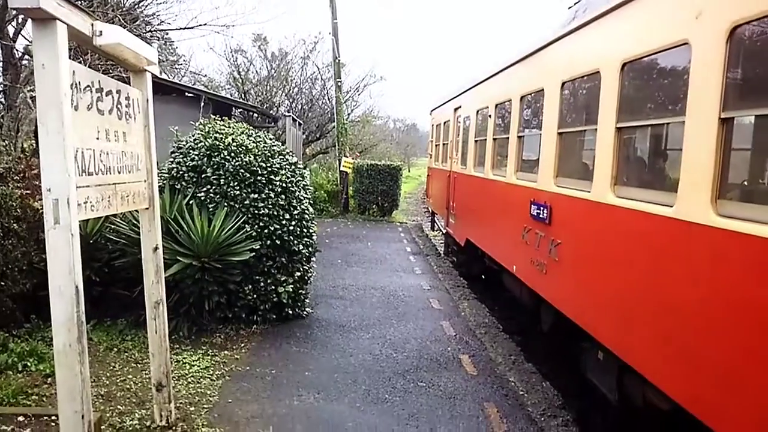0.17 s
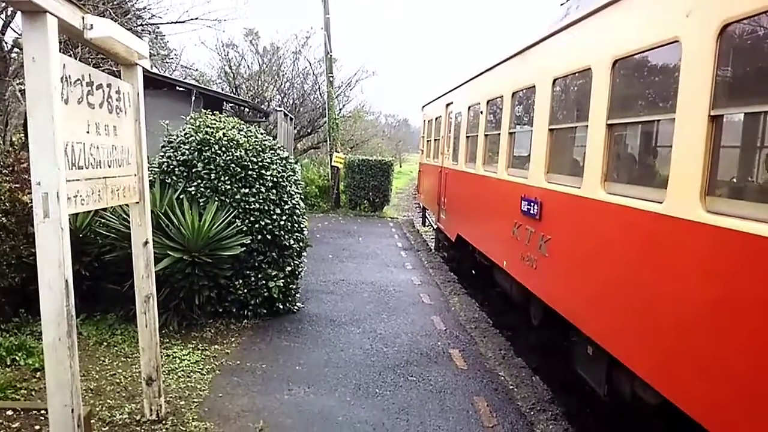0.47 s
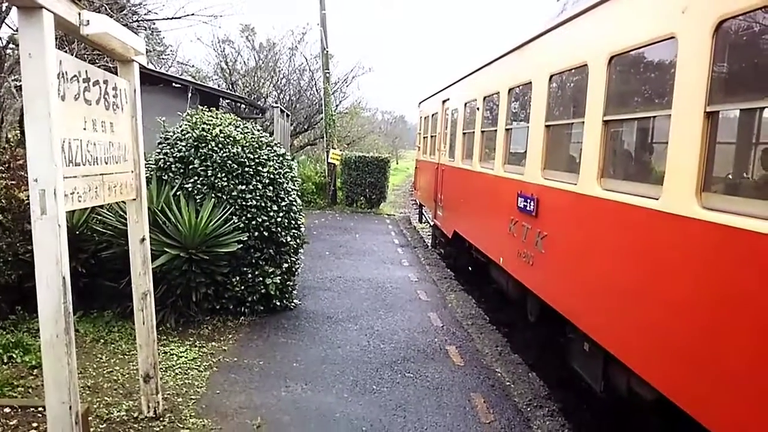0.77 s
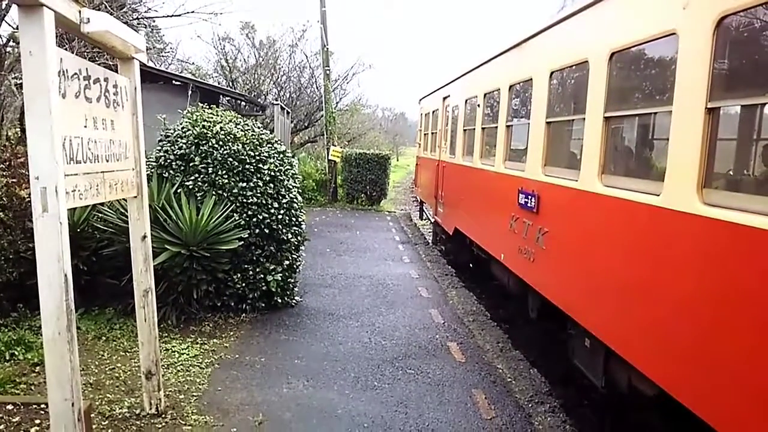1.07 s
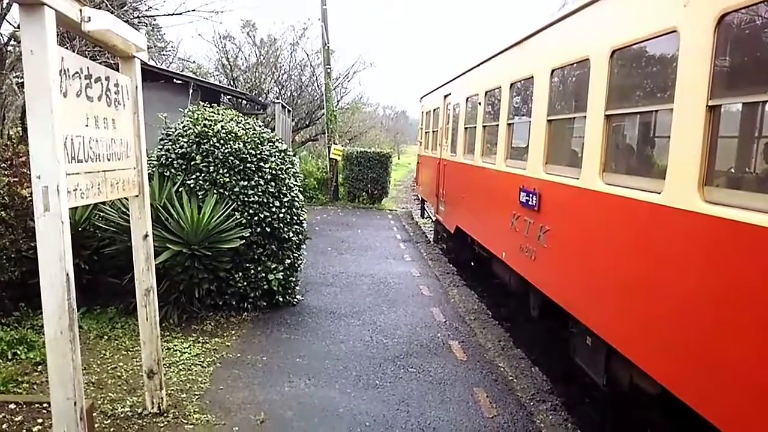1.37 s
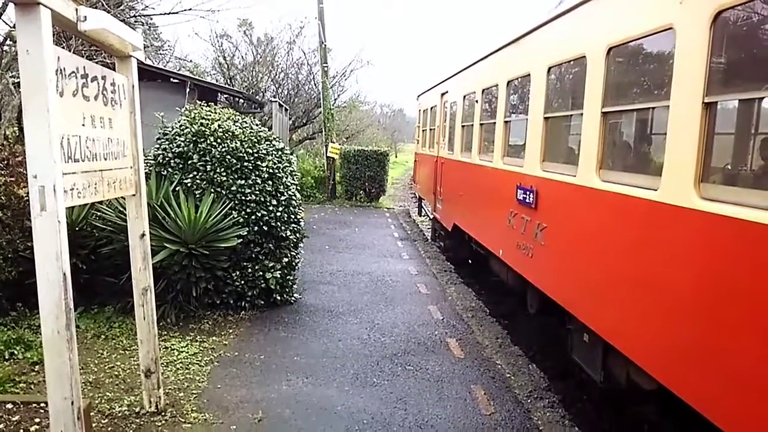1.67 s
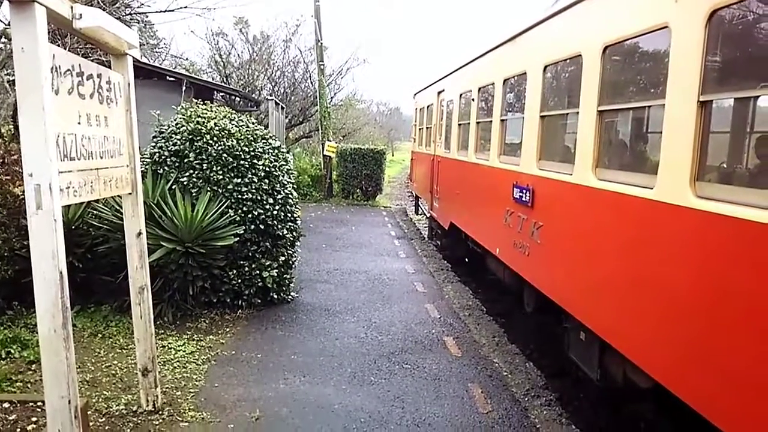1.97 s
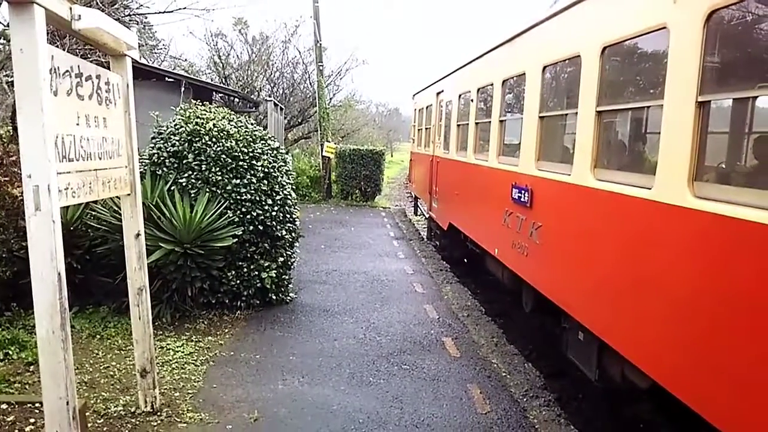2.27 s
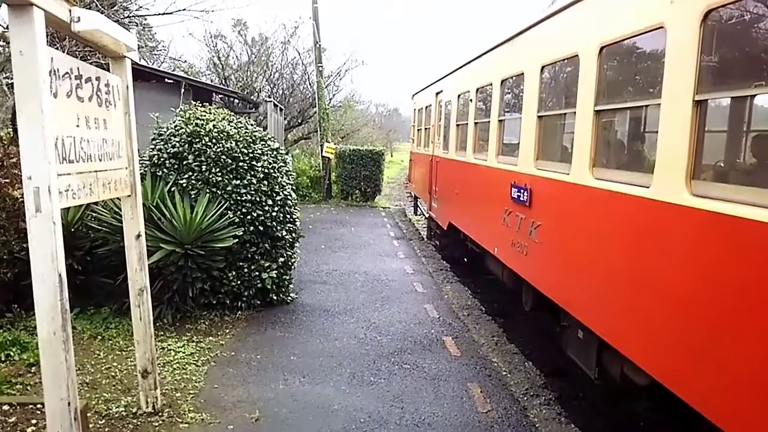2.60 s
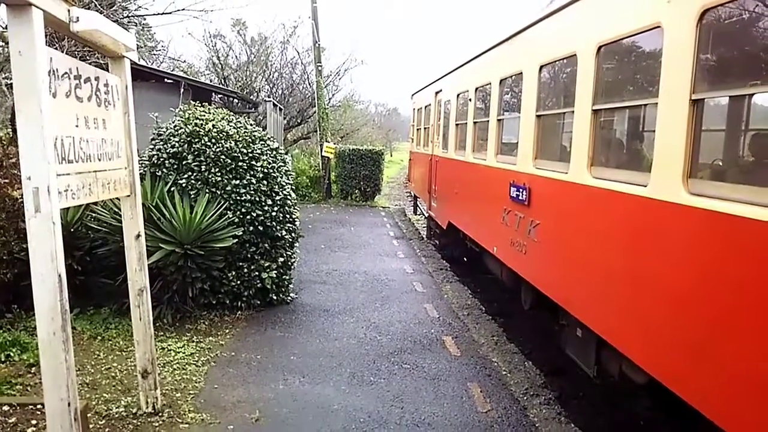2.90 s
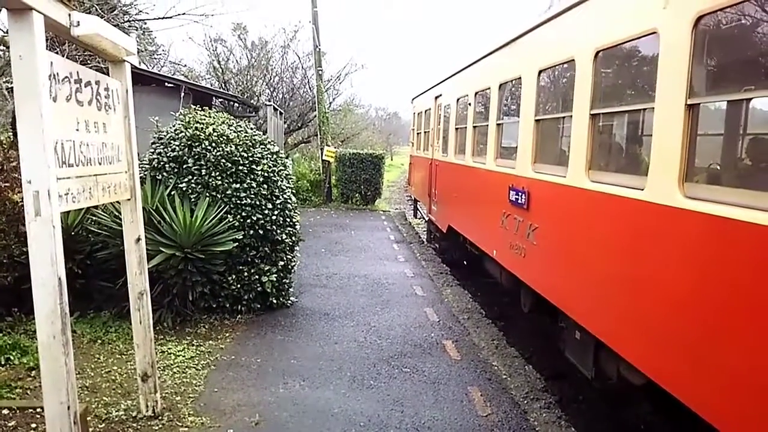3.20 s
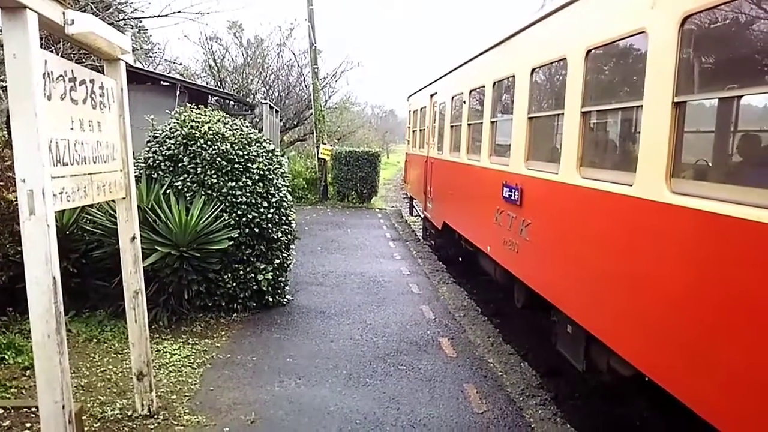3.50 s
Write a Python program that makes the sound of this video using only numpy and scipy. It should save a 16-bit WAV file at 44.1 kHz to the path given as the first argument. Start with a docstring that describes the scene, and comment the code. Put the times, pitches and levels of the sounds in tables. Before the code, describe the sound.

An old diesel railcar, a few metres away on an open platform. Until 1.5 s its engine hums fast and low, a loose steel cover rattling rapidly over steady hiss and faint air puffs. It drops to idle; a heavy crashing clank with an air rush hits at 1.87 s, a sharper ringing clank at 2.33 s. From 2.6 s the throb climbs, growling strongly after 3 s, with gritty chatter and a duller knock at 3.37 s.

```python
"""An old diesel railcar pulls away from a platform, a few metres from the listener.
The engine runs fast, sinks to idle and swells to a rising throb: harmonic tones and shaped noise follow
one firing phase. A loose steel cover rattles as noise under repeated knocks; heavy clanks, as drive and
coupling take up, are decaying modes with bursts of noise and echoes. Hiss, chance knocks and chatter of
the running gear are filtered noise, as are the faint puffs and longer rushes of air."""
import sys
import numpy as np
from scipy import signal
from scipy.fft import rfft, irfft
from scipy.io import wavfile

SR = 44100
rng = np.random.default_rng(int(sys.argv[2]) if len(sys.argv) > 2 else 0)


def master(y):
    """Save y as 16-bit WAV."""
    cut = np.clip(np.atleast_2d(y).T, -1, 1)
    pcm = np.round(cut * 32767)  # scale
    wavfile.write(sys.argv[1], SR, pcm.astype(np.int16))


N = 160965
T = np.arange(N) / SR  # time in seconds
KNOCK_RISE_S = 0.0042

# Course of the engine. Each row: time in seconds, firing rate in Hz,
# level of the exhaust note in dB before a fixed trim.
ENGINE_COURSE = [(0.03, 50.7, -50), (0.22, 53.9, -33.5), (0.53, 56.86, -30), (0.9, 57.44, -32),
                 (1.12, 56.8, -36), (1.35, 57.14, -29), (1.5, 54.4, -38), (1.58, 48.3, -39),
                 (1.68, 35.77, -37), (1.84, 35.06, -44), (2.23, 34.18, -54), (2.6, 35.07, -40),
                 (2.85, 41.07, -34), (3.04, 45.3, -24.5), (3.2, 50.25, -17.5), (3.5, 57.37, -17),
                 (3.56, 59.5, -32), (3.65, 62.1, -18)]
# Levels under the car, before fixed trims. Each row: time in seconds, rumble and exhaust overtones in dB,
# engine block in dB, clatter in dB.
UNDERCAR_LEVELS = [(0.03, -44, -45, -46), (0.15, -35.5, -36.5, -35.5), (0.26, -31, -33.5, -31.5),
                   (0.6, -35, -32, -30), (0.85, -29.5, -33.5, -31.5), (1.2, -31.5, -32.5, -29),
                   (1.44, -30, -33, -30), (1.54, -38.5, -34, -33), (1.7, -30, -34, -35),
                   (1.82, -34, -35, -36.5), (1.98, -27, -37, -37.5), (2.15, -33.5, -38.5, -34),
                   (2.3, -37, -36, -31), (2.45, -31.5, -36, -32), (2.58, -36.5, -40.5, -38.5),
                   (2.7, -33.5, -32.5, -32), (2.9, -30, -37, -34), (3.1, -31, -28.5, -31),
                   (3.2, -31, -35, -34), (3.28, -30.5, -27.5, -35), (3.45, -26.5, -37.5, -35),
                   (3.54, -25.5, -26.5, -33.5), (3.65, -26.5, -28, -31)]
# Unevenness of alternate firings. Each row: time in seconds, modulation depth from 0 to 1.
FIRING_UNEVENNESS = [(1.4, 0.2), (1.7, 0.1), (3.2, .55), (3.65, 0.39)]


def amp(db):
    """Logarithmic level: decibels become an amplitude ratio."""
    return 10 ** (np.asarray(db) / 20)


def unit(x):
    """Normalisation of power: scales a signal to rms 1."""
    return x / np.sqrt(np.mean(x ** 2) + 1e-20)


def curve(table, axis=1):
    """Linear interpolation: one column of a table becomes a course over time."""
    rows = np.array(table)
    return np.interp(T, rows[:, 0], rows[:, axis])


def colour(x, points):
    """Spectral filtering: weights x by a response interpolated over log frequency, at rms 1."""
    hz, db = np.transpose(points)
    f = np.fft.rfftfreq(N, 1 / SR)
    response = amp(np.interp(np.log(f + 1), np.log(hz + 1), db))
    return unit(irfft(rfft(x) * response, N))


def band(hz, width_hz):
    """Resonance: noise confined about one frequency, halved in amplitude width_hz away, at rms 1."""
    f = np.fft.rfftfreq(N, 1 / SR)
    resonance = 1 / (1 + ((f - hz) / width_hz) ** 2)
    return unit(irfft(rfft(rng.standard_normal(N)) * resonance, N))


def drift(hz):
    """Low-pass random fluctuation: a wander about zero, at rms 1."""
    return band(0, hz)


def grit(grain_db):
    """Friction noise: random amplitude modulation stands for tiny contacts of unequal strength."""
    return unit(rng.standard_normal(N) * amp(grain_db * drift(650)))


def strike(start, rise, t60):
    """Impulsive excitation: a linear rise, then exponential decay by 60 dB in t60 seconds."""
    age = T[:SR]
    decay = amp(-60 * np.maximum(age - rise, 0) / t60)
    return np.pad(np.minimum(age / rise, 1) * decay, (round(start * SR), N))[:N]


def ring(modes, start, rise):
    """Modal superposition: a struck part sounds as a sum of decaying sines."""
    age = T[:SR]
    hz, db, t60 = np.transpose(modes)[:, :, None]
    decay = amp(db - 60 * np.maximum(age - rise, 0) / t60)
    tones = decay * np.sin(2 * np.pi * (hz * age + rng.random(hz.shape)))
    return np.pad(np.minimum(age / rise, 1) * tones.sum(0), (round(start * SR), N))[:N]


def steely(x, share=0.43, t60=0.039):
    """High modal density: convolution with decaying noise adds the short ringing of a steel sheet."""
    tail = rng.standard_normal(N) * strike(0, 1 / SR, t60)
    return x + share * signal.fftconvolve(x, tail / np.linalg.norm(tail))[:N]


def knock_series(at, spread_db, t60):
    """Repeated impacts: a pulse of random strength at each given sample excites a decaying envelope."""
    strengths = amp(spread_db * np.clip(rng.standard_normal(N), -2, 2))
    hits = np.zeros(N)
    hits[at] = strengths[:len(at)]
    return unit(signal.fftconvolve(hits, strike(0, KNOCK_RISE_S, t60))[:N])


def chance_knocks(knocks_per_s, spread_db, t60):
    """Poisson-like excitation: knocks fall at random moments with a fixed mean rate."""
    moments = np.flatnonzero(rng.random(N) < knocks_per_s / SR)
    return knock_series(moments, spread_db, t60)


def throb(turns, depth):
    """Subharmonic modulation at half the firing rate: every second firing is the stronger one."""
    return unit(1 + depth * np.sin(np.pi * turns + np.pi / 4))


def yard(x, above_hz=300):
    """Diffuse reflection: sparse decaying echoes between car body and platform, without the bass."""
    echo_db, echoes_per_s = -12, 2000
    chosen = rng.random(N) < echoes_per_s / SR
    tail = rng.standard_normal(N) * chosen * strike(0.011, 0.0055, t60=0.15)
    tail = signal.sosfilt(signal.butter(4, above_hz, "high", fs=SR, output="sos"), tail)
    return x + amp(echo_db) * signal.fftconvolve(x, tail / np.linalg.norm(tail))[:N]


def puffs(count=5):
    """Turbulent jet noise: regular puffs of air, probably from the compressor, and longer rushes."""
    # Spectrum of the air. Each row: frequency in Hz, relative level in dB.
    air_spectrum = [(3000, -21), (6000, 6.5), (8500, 4.5), (10500, -3.5), (14000, -20)]
    # Longer rushes. Each row: start in seconds, level in dB.
    air_rushes = [(1.856, -22), (3.37, -31)]
    first_s, every_s, length_s, puff_db = 0.243, 0.29, 0.053, -39
    swell = np.zeros(N)
    for k in range(count):
        progress = np.clip((T - first_s - k * every_s) / length_s, 0, 1)
        swell += np.sin(np.pi * progress)
    rushes = sum(amp(db) * strike(start, rise=0.016, t60=0.36) for start, db in air_rushes)
    return (amp(puff_db) * swell + rushes) * colour(grit(3.6), air_spectrum)


def sizzle(turns, depth=0.057, knocks_per_s=45, knock_share=0.29, ring_flutter_db=2):
    """Amplitude modulation: firings and chance knocks shape the running gear's hiss and thin steel ring."""
    # Levels. Each row: time in seconds, hiss in dB, steel ring in dB.
    sizzle_levels = [(0.03, -49, -66), (0.25, -39.5, -47), (1.5, -38.5, -40.5), (1.8, -34.5, -67),
                     (2.05, -34, -61), (2.2, -37.5, -65), (2.6, -35.5, -50), (2.75, -33.5, -39),
                     (3.1, -32, -43.5), (3.3, -33, -38), (3.45, -28.5, -44), (3.65, -35.5, -51)]
    # Spectrum of the hiss. Each row: frequency in Hz, relative level in dB.
    hiss_spectrum = [(1530, -16), (2600, -18), (3170, -23), (3540, -1.5), (3670, -6), (4140, -4.5),
                     (4470, -5.5), (4970, -4), (6780, 0), (7860, -10), (11700, -19), (14000, -28)]
    ring_hz, ring_width_hz = 3680, 110
    knocks = chance_knocks(knocks_per_s, spread_db=2.0, t60=0.059)
    firing = 1 + depth * np.cos(2 * np.pi * turns)
    beat = unit(firing * (1 - knock_share + knock_share * knocks))
    hiss = colour(steely(grit(0.61)), hiss_spectrum)
    steel_ring = unit(band(ring_hz, ring_width_hz) * amp(ring_flutter_db * drift(33)))
    return beat * (amp(curve(sizzle_levels, axis=1)) * hiss + amp(curve(sizzle_levels, axis=2)) * steel_ring)


def chatter(knocks_per_s=260):
    """Dense random impacts: small contacts ring the running gear with a gritty sound."""
    # Each row: time in seconds, level in dB.
    chatter_level = [(2.55, -65), (2.72, -36.5), (2.85, -53), (2.95, -34), (3.02, -44), (3.1, -34),
                     (3.16, -40), (3.36, -42), (3.5, -49), (3.65, -47)]
    # Ringing of the gear. Each row: frequency in Hz, relative level in dB.
    chatter_spectrum = [(3000, -40), (3450, -12), (3700, 0), (4100, 5), (4500, -1), (5200, -19),
                        (7000, -30)]
    knocks = chance_knocks(knocks_per_s, spread_db=1.5, t60=0.046)
    return amp(curve(chatter_level)) * colour(knocks * rng.standard_normal(N), chatter_spectrum)


def rattle_beat():
    """Periodic impact: the cover knocks at its own rate while the engine runs fast."""
    # Each row: time in seconds, knocks per second.
    rattle_rate = [(0.38, 26.9), (0.44, 29.3), (0.65, 29.3), (0.71, 27), (0.99, 27), (1.05, 28.3),
                   (1.27, 28.3), (1.33, 30)]
    start_s = 0.035
    knock_count = np.cumsum(curve(rattle_rate) * (T > start_s)) / SR
    moments = np.flatnonzero(np.diff(np.ceil(knock_count)))
    return knock_series(moments, spread_db=3.5, t60=0.17)


def loose_steel(knocking, t60=0.17):
    """Impact and resonance: knocks gate the steel noise of the cover, and louder single ones also ring."""
    # Strength of the cover's rattle. Each row: time in seconds, level in dB.
    rattle_level = [(0.04, -39.5), (0.12, -40), (0.155, -32), (0.2, -43.5), (0.24, -31.5), (0.38, -34),
                    (0.48, -34.5), (0.54, -29), (0.63, -29.5), (0.69, -36.5), (0.78, -41), (0.85, -31),
                    (0.95, -36), (1.12, -33), (1.35, -33.5), (1.48, -31), (1.62, -42), (1.8, -51),
                    (2.2, -54), (3.65, -62)]
    # Spectrum of the cover. Each row: frequency in Hz, relative level in dB.
    cover_spectrum = [(1530, -37), (2600, -10.5), (2950, -5), (3330, 7), (3750, -9), (4110, 0.5),
                      (6450, 1.5), (7320, -14), (7970, -15.5), (8610, -21.5), (9770, -31), (12500, -31),
                      (14000, -26)]
    # Knocks of loose steel under the car. Each row: start in seconds, level in dB, ring frequency in Hz,
    # ring level in dB relative to the scrape.
    single_knocks = [(.223, -30, 3320, 0), (.334, -39, 6430, 5), (.408, -37, 3400, -2),
                     (0.44, -37, 3370, 7), (.510, -27.5, 3380, -5), (.612, -33, 5400, -3),
                     (0.719, -29.5, 3300, -3.5), (.975, -33, 6400, -3), (1.011, -25, 3378, -1.5),
                     (1.12, -32, 3960, -1), (1.193, -38, 3370, -8), (1.294, -27.5, 3300, -1.5),
                     (1.468, -33, 5620, -7), (1.527, -29, 3790, 5.5), (1.555, -34, 3650, 5),
                     (1.641, -40, 5700, 10.5), (1.822, -34, 2370, 2.5), (1.995, -30, 6720, -5),
                     (2.028, -34, 3446, -2), (2.248, -31.5, 3800, 4.5), (2.281, -43, 1343, 14),
                     (2.287, -32.5, 7180, 6.5), (2.432, -32.5, 3740, 3), (2.497, -30, 5730, 0.5),
                     (2.640, -40, 6960, 4), (2.724, -39.5, 3656, 12), (2.921, -38, 3730, 7.5),
                     (3.035, -41, 4100, 6.5), (3.092, -39, 3850, 7.5), (3.115, -45, 1490, 14.5),
                     (3.605, -32, 3795, -6)]
    ring_width_hz = 190
    scrape = colour(steely(grit(3.3)), cover_spectrum)
    out = amp(curve(rattle_level)) * knocking * colour(steely(grit(2.4)), cover_spectrum)
    for start, db, hz, ring_db in single_knocks:
        knock_sound = scrape + amp(ring_db) * band(hz, ring_width_hz)
        out += amp(db) * strike(start, KNOCK_RISE_S, t60) * knock_sound
    return out


def clanks():
    """Impulsive modal excitation: slack taken up crashes steel and sets body, drive and coupling ringing."""
    # Each row: start in seconds, crash in dB, rise in seconds, crash t60 in seconds, low thump in dB,
    # drive knock in dB, coupling ring in dB.
    blows = [(0.696, -42, 0.0079, .2, -24, -37, -23.5), (1.675, -53, 0.0098, .15, -23, -34, -42),
             (1.860, -21.5, 0.01, 0.36, -18, -15, -31), (1.869, -17, 0.0028, 0.07, -40, -30, -36),
             (1.887, -24.5, .003, 0.22, -25, -30, -42), (1.914, -29.5, 0.0036, 0.34, -14, -23, -34),
             (2.324, -21, 0.014, 0.29, -50, -50, -15), (2.331, -20.5, 0.0051, 0.18, -50, -50, -31),
             (2.357, -34, 0.0066, .16, -50, -50, -25.5), (2.419, -48, .006, 0.21, -26, -36, -37),
             (2.862, -52, .006, 0.16, -19, -40, -44), (3.368, -27, 0.011, 0.61, -27, -19.5, -46)]
    # Spectrum of the crash. Each row: frequency in Hz, relative level in dB.
    crash_spectrum = [(100, -18), (400, -5), (620, -4), (900, 2.5), (1230, -10), (1650, 0), (1900, -1.5),
                      (2400, 3), (3000, -2.5), (3700, 2.5), (4500, -2.5), (6600, 4), (8000, -8.5),
                      (10000, -24), (14000, -42)]
    # Dull boom of the underframe behind the coupling. Each row: frequency in Hz, relative level in dB.
    frame_spectrum = [(170, -24), (270, 10), (400, -2), (540, 4), (760, 3), (900, 2.5), (1150, -5),
                      (1600, -7.5), (3000, -38)]
    # Modes of the sprung body. Each row: frequency in Hz, relative level in dB, t60 in seconds.
    body_modes = [(81.2, 0.5, 0.12)]
    # Modes of the drive. Each row: frequency in Hz, relative level in dB, t60 in seconds.
    drive_modes = [(164.5, -0.5, 0.176), (374.4, -10.5, 0.14)]
    # Modes of the coupling. Each row: frequency in Hz, relative level in dB, t60 in seconds.
    coupling_modes = [(279.6, 1, 0.26), (305, 0, 0.16), (517.5, -7.5, .13), (560, -14, .2), (664, -9.5, .2),
                      (867, -4.5, 0.16), (898, -11.5, 0.11), (2000, -12.5, 0.17), (6860, -24, .35)]
    # Modes of the steel fittings. Each row: frequency in Hz, relative level in dB, t60 in seconds.
    steel_modes = [(1604, 8, 0.22), (2140, 5, 0.15), (2290, 7, 0.079), (2534, 10, 0.054), (4650, 2, 0.12),
                   (5146, -3, 0.26), (6660, 2, 0.34)]
    steel_db, frame_db, frame_t60_s = -15, -7, 0.36
    crash_noise = colour(steely(grit(2.2)), crash_spectrum)
    boom_noise = colour(grit(1.0), frame_spectrum)
    out = np.zeros(N)
    for start, db, rise, t60, thump_db, drive_db, coupling_db in blows:
        crash = strike(start, rise, t60) * crash_noise
        out += amp(db) * (crash + amp(steel_db) * ring(steel_modes, start, rise))
        out += amp(thump_db) * ring(body_modes, start, rise)
        out += amp(drive_db) * ring(drive_modes, start, rise)
        boom = strike(start, rise, frame_t60_s) * boom_noise
        out += amp(coupling_db) * (ring(coupling_modes, start, rise) + amp(frame_db) * boom)
    return out


def growl(turns, depth=0.4, lump=0.45):
    """Load-dependent radiation: under load each firing barks through the underframe."""
    # Each row: time in seconds, level in dB.
    load_level = [(2.6, -62.5), (2.95, -49), (3.1, -32), (3.2, -34), (3.28, -27.5), (3.44, -33),
                  (3.55, -30), (3.65, -28)]
    # Each row: frequency in Hz, relative level in dB.
    growl_spectrum = [(100, -29), (200, -11), (275, 9.5), (400, 3), (520, -16), (630, -2), (760, -6),
                      (960, 2.5), (1200, -16), (1450, -2.5), (1700, -7), (1950, -18.5), (2300, -11),
                      (3000, -25), (6000, -46)]
    firing = 1 + depth * np.cos(2 * np.pi * turns)
    return amp(curve(load_level)) * colour(grit(1.6) * throb(turns, lump) * firing, growl_spectrum)


def block(turns, knocking, depth=0.1, uneven_db=1.0, knock_share=0.38):
    """Structure-borne sound: each firing shakes the underframe, the engine block and the valve gear."""
    # Underframe. Each row: frequency in Hz, relative level in dB.
    rumble_spectrum = [(15, -22), (40, -15), (60, -3.5), (75, 3), (110, -1), (170, -7), (260, -11),
                       (600, -71)]
    # Engine block. Each row: frequency in Hz, relative level in dB.
    block_spectrum = [(90, -25), (170, -9), (220, -3), (280, -0.5), (340, -2.5), (400, 2), (480, -6),
                      (600, -3), (720, -10), (1000, -33), (2000, -60)]
    # Valve gear. Each row: frequency in Hz, relative level in dB.
    clatter_spectrum = [(400, -21.5), (700, -2.5), (870, 1), (1120, 1), (1300, -4.5), (1650, -5),
                        (1950, -14), (2600, -19), (3200, -15.5), (4000, -24), (9000, -63)]
    rumble_trim_db, block_trim_db, clatter_trim_db = -1.5, 2.5, 2
    beat = unit((1 + depth * np.cos(2 * np.pi * turns)) * amp(uneven_db * drift(13)))
    clatter_beat = unit((1 - knock_share) * beat + knock_share * knocking)
    throbbing = beat * throb(turns, curve(FIRING_UNEVENNESS))
    rumble = colour(grit(0.92) * throbbing, rumble_spectrum)
    block_noise = colour(grit(1.45) * beat, block_spectrum)
    clatter = colour(grit(1.2) * clatter_beat, clatter_spectrum)
    return (amp(rumble_trim_db + curve(UNDERCAR_LEVELS, axis=1)) * rumble
            + amp(block_trim_db + curve(UNDERCAR_LEVELS, axis=2)) * block_noise
            + amp(clatter_trim_db + curve(UNDERCAR_LEVELS, axis=3)) * clatter)


def exhaust(turns, rough=0.086, overtone_rough=0.41):
    """Additive synthesis: a firing note and overtones, some inharmonic, from unevenly firing cylinders."""
    # Each row: multiple of the firing rate, relative level in dB.
    firing_orders = [(1.25, -17.5), (1.501, -7.5), (1.699, -7.5), (2, -5.5), (2.252, -10), (2.5, -9.5),
                     (2.999, -13.5)]
    note_trim_db, overtone_trim_db = -4.5, -1
    note = np.sqrt(2) * np.sin(2 * np.pi * turns) * (1 + rough * drift(22))
    overtones = np.zeros(N)
    for multiple, db in firing_orders:
        tone = np.sin(2 * np.pi * (multiple * turns + rng.random()))
        overtones += amp(db) * tone * (1 + overtone_rough * drift(3.9))
    firing = amp(note_trim_db + curve(ENGINE_COURSE, axis=2)) * note
    firing += amp(overtone_trim_db + curve(UNDERCAR_LEVELS, axis=1)) * unit(overtones)
    return throb(turns, curve(FIRING_UNEVENNESS)) * firing


def scene():
    """Superposition at the platform: engine, running gear, air, loose steel and echoing clanks add."""
    turns = np.cumsum(curve(ENGINE_COURSE, axis=1)) / SR  # firing phase, one per firing
    knocking = rattle_beat()
    engine = exhaust(turns) + block(turns, knocking) + growl(turns)
    running_gear = sizzle(turns) + chatter()
    return (engine + running_gear + puffs() + loose_steel(knocking) + yard(clanks()))[None]


def record(dry, open_s=0.014, fade_s=0.029, low_cut_hz=28):
    """A fade-in at the start, then transducer limits: the microphone's low cut, soft saturation of peaks and a
    band limit."""
    ceiling, edge_hz = 0.9, 14050
    low_cut = signal.butter(4, low_cut_hz, "high", fs=SR, output="sos")
    faded = signal.sosfilt(low_cut, dry * np.clip((T - open_s) / fade_s, 0, 1))
    rounded = faded / (1 + (faded / ceiling) ** 4) ** 0.25
    band_limit = signal.firwin(511, edge_hz, window=("kaiser", 9), fs=SR)
    return signal.oaconvolve(rounded, band_limit[None], "same")


dry = scene()
out = record(dry)
master(out)
```